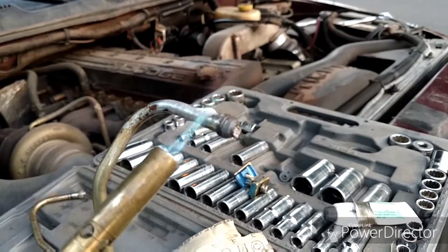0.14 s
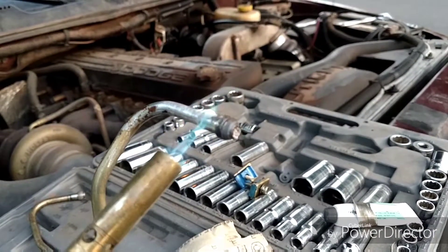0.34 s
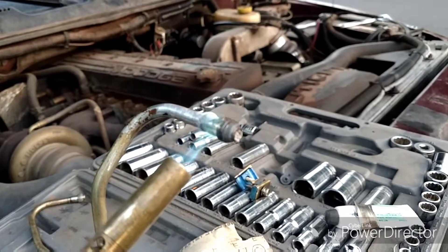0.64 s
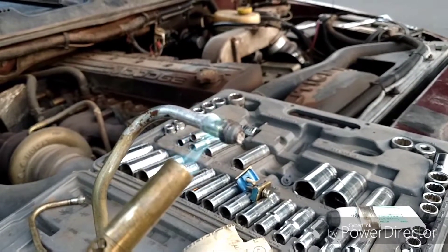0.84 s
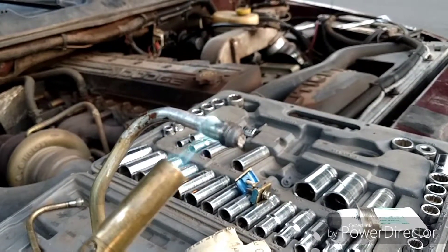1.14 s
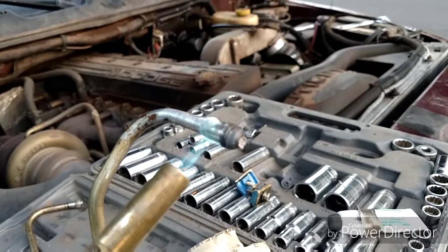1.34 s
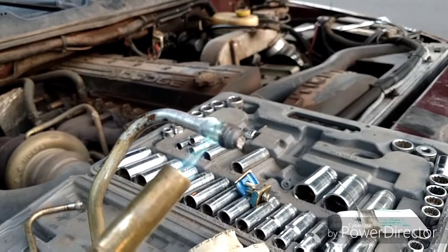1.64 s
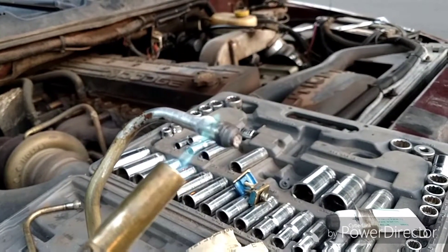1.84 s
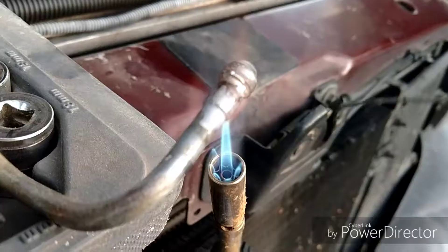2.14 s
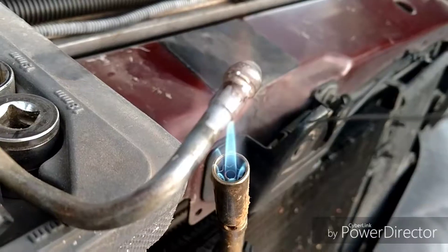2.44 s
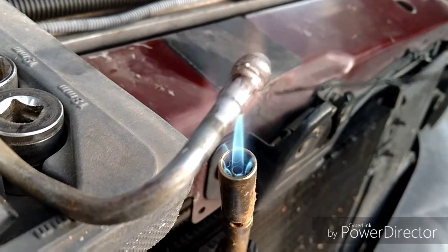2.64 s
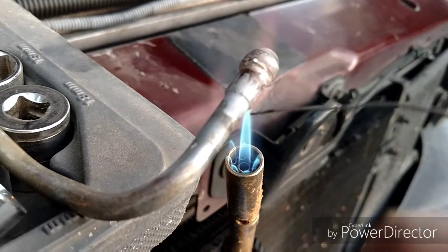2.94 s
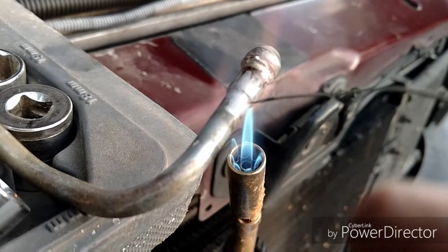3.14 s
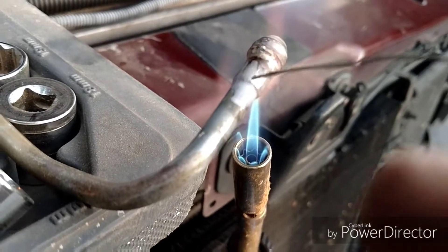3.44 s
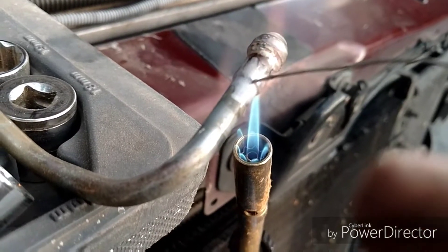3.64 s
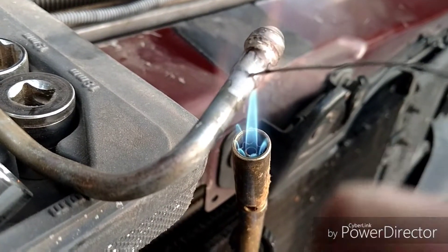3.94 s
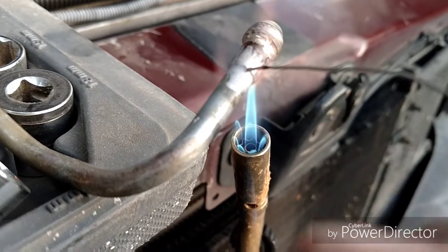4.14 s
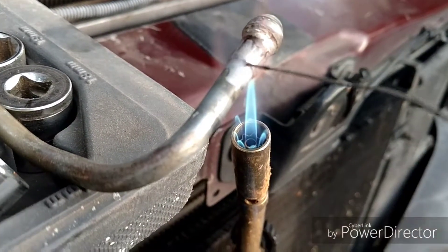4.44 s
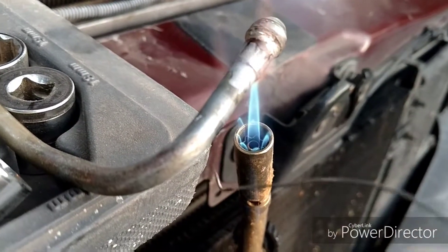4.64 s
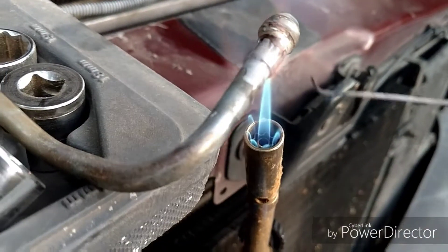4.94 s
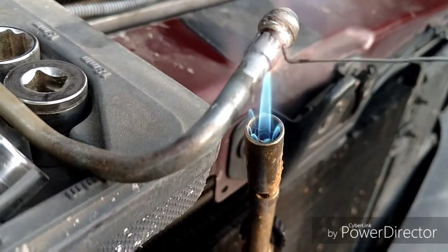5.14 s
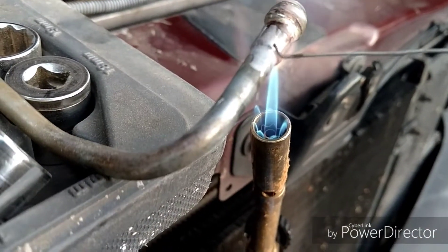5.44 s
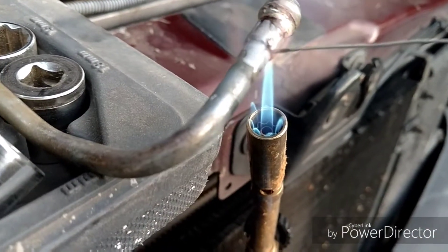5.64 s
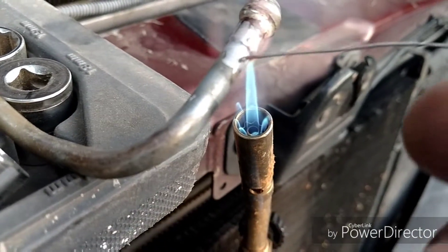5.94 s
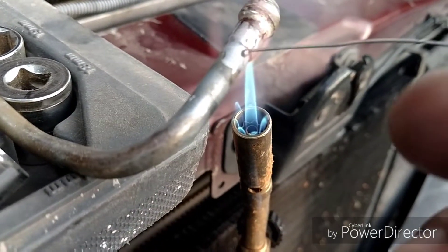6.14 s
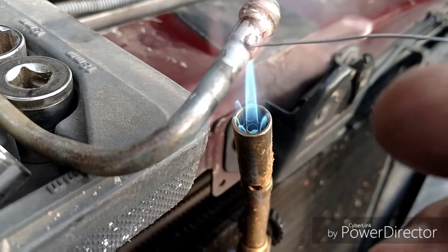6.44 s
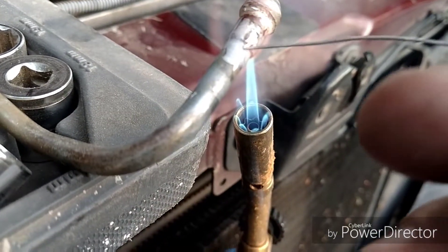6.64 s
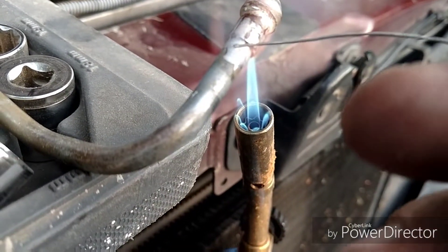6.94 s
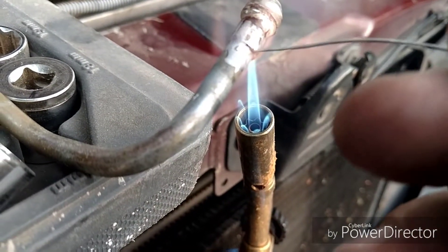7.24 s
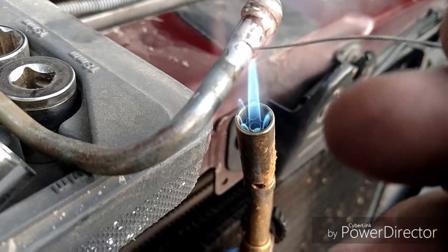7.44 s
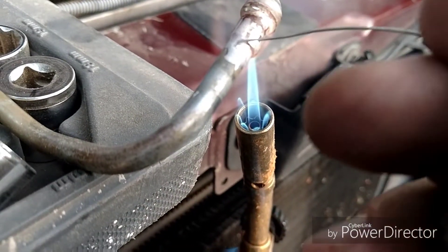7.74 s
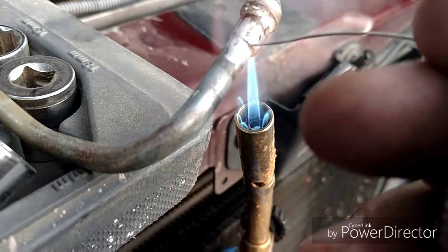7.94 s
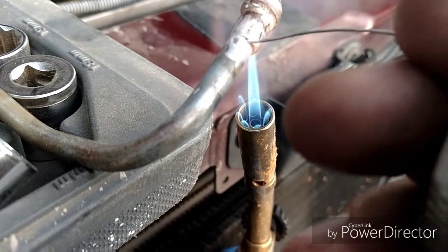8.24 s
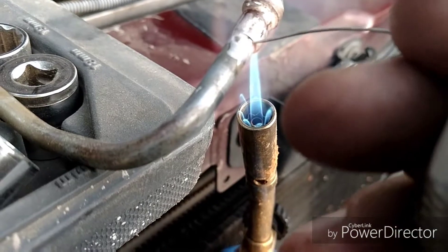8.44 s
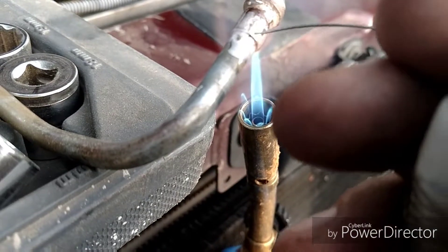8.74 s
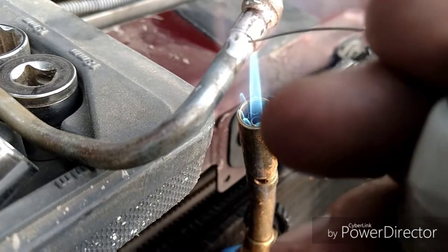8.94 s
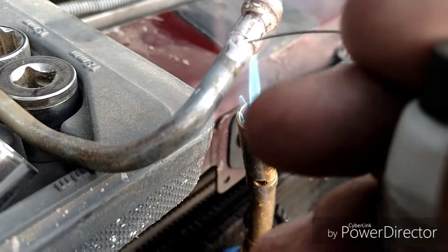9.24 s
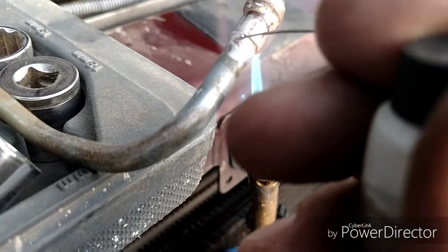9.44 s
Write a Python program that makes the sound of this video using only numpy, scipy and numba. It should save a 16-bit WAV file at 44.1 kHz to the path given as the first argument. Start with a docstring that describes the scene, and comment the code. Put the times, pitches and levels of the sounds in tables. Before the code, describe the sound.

Wavering torch hiss over a distant exhaust drone, a sharp click, then a sudden cut to steady close flame roar and a brief metallic scrape.

```python
"""Gas torch on a steel pipe

A gas torch roars and hisses over an open engine bay, close to a hand-held phone with a port at each end.
At first an engine gathers speed some way off; a sharp click beside the phone makes the limiter duck.
After a quick cross-fade the flame burns closer and steadily, and a solder wire taps and scrapes the pipe.
Gas is shaped noise, exhaust a sum of harmonics, clicks damped sines, and the pipe a set of struck modes."""
import sys
import numpy as np
from scipy import signal
from scipy.fft import rfft, irfft
from scipy.io import wavfile
from scipy.ndimage import uniform_filter1d, minimum_filter1d, map_coordinates
from numba import njit

SR = 44100
rng = np.random.default_rng(int(sys.argv[2]) if len(sys.argv) > 2 else 0)


def put_to_file(sound):
    """Save the sound as 16-bit audio at rate SR, in the file named by the first command-line argument."""
    columns = np.atleast_2d(sound).T  # one column per channel
    safe = np.clip(columns, -1, 1)
    whole_steps = np.round(safe * 32767)
    wavfile.write(sys.argv[1], SR, whole_steps.astype(np.int16))


N = 422478
T = np.arange(N) / SR  # time in s
F = np.maximum(np.fft.rfftfreq(N, 1 / SR), 1)  # frequency in Hz
CUT_S = 2.13  # middle of the cross-fade from the wide to the close position
PORT_NULL_HZ = 2163.5  # sound needs one period of this to travel from port to port
ROAR_TOP_HZ, HISS_TOP_HZ = 2150, 6500  # roar lies below, hiss between, sizzle above


def undb(db):
    """Level law: decibels to amplitude gain."""
    return 10 ** (np.asarray(db) / 20)


def rms(x):
    """Effective value: root mean square."""
    return np.sqrt(np.mean(x ** 2))


def curves(table):
    """Linear interpolation: the columns of a time table at every sample."""
    s, *columns = np.transpose(table)
    return [np.interp(T, s, column) for column in columns]


def colours(table):
    """Interpolation over log frequency: the columns of a frequency table at every bin."""
    hz, *columns = np.transpose(table)
    return [np.interp(np.log(F), np.log(hz), column) for column in columns]


def white():
    """White noise: a fresh spectrum with equal power at every frequency on average."""
    return rfft(rng.standard_normal(N))


def walk(rate_hz):
    """Low-passed noise: a smooth random course with rms 1 that moves about rate_hz times a second."""
    x = irfft(white() / (1 + (F / rate_hz) ** 4), N)
    return x / rms(x)


def resonance(hz, width_hz):
    """Damped resonance: the response of one mode, gain 1 at its centre."""
    return 1 / (1 + 1j * (F / hz - hz / F) * hz / width_hz)


@njit
def band_pass(x, hz, width_hz):
    """State-variable filter: a band-pass whose centre may move, gain 1 there."""
    y, band, low = np.empty(len(x)), 0., 0.
    for i in range(len(x)):
        g = np.tan(np.pi * hz[i] / SR)
        damping = width_hz / hz[i]
        v = (band + g * (x[i] - low)) / (1 + g * (g + damping))
        band = 2 * v - band
        low = low + 2 * g * v
        y[i] = damping * v
    return y


def lift(x, hz, width_hz, db):
    """Peaking equalisation: raises or hollows one band; its centre and depth may move."""
    return x + (undb(db) - 1) * band_pass(x, hz + np.zeros(N), float(width_hz))


def swells(table):
    """Narrow-band noise: resonated noise bands under bell-shaped envelopes."""
    out = np.zeros(N)
    for s, db, half_length, hz, width in table:
        band = irfft(white() * resonance(hz, width) ** 2, N)
        out += undb(db) * band / rms(band) * np.exp(-((T - s) / half_length) ** 2)
    return out


def turbulence(colour, reach_hz, depth, notch_width=0.6):
    """Partial coherence: gas noise at two spaced ports, with alternate mid and side notches up to reach_hz."""
    mid_db, side_db, lean, lead = colours(colour)
    shared = lean + 1j * lead
    shared = shared / np.maximum(abs(shared) / .98, 1)  # coherence stays below 1
    mid = white()
    side = shared * mid + np.sqrt(1 - abs(shared) ** 2) * white()
    angle = np.pi * F / PORT_NULL_HZ
    cut = min(depth, 1) * np.exp(-(F / reach_hz) ** 8)
    mid_notch = 1 - cut * np.exp(-(np.sin(angle) / notch_width) ** 2) * (angle > np.pi / 2)
    side_notch = 1 - cut * np.exp(-(np.cos(angle) / notch_width) ** 2)
    return np.array([mid * mid_notch * undb(mid_db), side * side_notch * undb(side_db)])


def part(gas, lo_hz, hi_hz):
    """Band splitting: left and right of one range of the gas noise, relative to the body of the roar."""
    mid, side = irfft(gas * (F >= lo_hz) * (F < hi_hz), N)
    body = irfft(gas[0] * (F > 350) * (F < ROAR_TOP_HZ), N)
    return np.array([mid + side, mid - side]) / rms(body)


def torch(flame, colour, hollows, reach_hz, notch_depth, flutter_db, sputter_db, grain_db):
    """Turbulent combustion: the roar flutters; hiss and sizzle share half of it, with sputter and fine grain."""
    roar_db, hiss_db, sizzle_db = flame
    gas = turbulence(colour, reach_hz, notch_depth)
    for hz, width, db in hollows:
        gas = gas * (1 + (undb(db) - 1) * resonance(hz, width))
    roar = part(gas, 0, ROAR_TOP_HZ)
    hiss = part(gas, ROAR_TOP_HZ, HISS_TOP_HZ)
    sizzle = part(gas, HISS_TOP_HZ, SR / 2)
    flutter = flutter_db * walk(33.0)
    jet_db = flutter / 2 + sputter_db * walk(24.0) + grain_db * walk(236)
    return roar * undb(roar_db + flutter) + hiss * undb(hiss_db + jet_db) + sizzle * undb(sizzle_db + jet_db)


def thinning(x, hz, width_hz, start_db, fall_db_per_s):
    """Spectral tilt in time: the low body of the roar thins out as the flame settles on the pipe."""
    return np.array([lift(port, hz, width_hz, start_db - fall_db_per_s * T) for port in x])


# How squarely the hand-held flame meets the pipe: time_s, hiss_lift_db
AIM_LIFT = [(0, 2), (.1, 0.5), (.19, 2.5), (.46, 5.5), (.6, 6), (.69, 3.5), (.78, 0), (1.3, 1), (1.51, -2),
            (1.6, 2), (1.74, 3.5)]


def wandering_flame():
    """Impingement: roar, hiss and sizzle levels in dB grow as the flame meets the pipe more squarely."""
    base_db = np.array([[-35], [-34.5], [-34.5]])
    aim_db, = curves(AIM_LIFT)
    shares = [0.6, 1, 0.19]  # of the hiss lift, in roar, hiss and sizzle
    return base_db + np.outer(shares, aim_db) + surges()


def sway(x, lag_s, rate_hz=4.8):
    """Variable delay: the flame shifts before the phone, so the lag between ports and the notches wander."""
    shift = lag_s * SR * walk(rate_hz) / 2
    moved = [map_coordinates(port, [np.arange(N) + sign * shift], order=3, mode="mirror")
             for port, sign in zip(x, (1, -1))]
    return np.array(moved)


# Colour of the wide torch noise, its low and its high range:
# pitch_hz, relative_mid_db, relative_side_db, left_lean (-1..1), left_port_lead (-1..1)
WIDE_LOW_COLOUR = [(40, -24.0, -13.0, 0, 0), (126, -7, -14, 0.3, -0.65), (330, -8, -10.5, 0.35, -0.29),
                   (594, -6.5, -11, 0.18, -0.46), (1010, -0.5, 1, 0.65, -0.13),
                   (1500, -13.5, -10, -1.0, 0.23), (1650, -17.5, -16, 0.069, 0.86),
                   (1900, -7, -6, 0.035, 0.79)]
WIDE_HIGH_COLOUR = [(2180, -13, -18.0, 0.2, 0.06), (2800, -11.5, -11.5, 0.95, 0.14),
                    (3400, -18, -13, -0.34, -0.12), (3900, -18.5, -9.5, 0.21, -0.74),
                    (4300, -8, -16.5, -0.25, 0.38), (5200, -10, -12, -0.013, 0.0095),
                    (6430, -28, -24.5, -0.22, -0.1), (7400, -21.5, -15, 0.22, -0.05),
                    (8440, -31, -32, -0.02, 0.18), (9000, -21.5, -16, 0.42, -0.21),
                    (10500, -23.0, -22, -0.2, -0.06), (12500, -23.5, -25.5, -0.42, 0.08),
                    (15200, -29.5, -27.0, -0.31, -0.04)]
# Hollows of burner tube and engine bay that the gas noise rings: pitch_hz, width_hz, lift_db
WIDE_HOLLOWS = [(268, 9, 10), (1040, 110, 0.5), (1240, 99, 4.5), (1890, 74, 3.5)]


def wide_torch():
    """Cavity-coloured jet noise: the torch from the wide position, its aim wandering."""
    colour = list(WIDE_LOW_COLOUR) + list(WIDE_HIGH_COLOUR)
    gas = torch(wandering_flame(), colour, WIDE_HOLLOWS, reach_hz=11400, notch_depth=1.0,
                flutter_db=1.23, sputter_db=0.8, grain_db=0.6)
    return thinning(sway(gas, lag_s=0.000005), hz=368, width_hz=150, start_db=1.0, fall_db_per_s=2.0)


# Exhaust lines: cycle_rate_multiple, relative_db, left_minus_right_db, left_port_lead_rad
EXHAUST_LINES = [(5, -4, 3, -1.94), (6, -26, -4, -1.5), (7, -12, -5, -1.2), (8, -4, 5.5, -0.81),
                 (9, -17, 3, 0.15), (10, -10, 8, -0.31), (11, -4.5, 3, -1.3), (13, -21, -1, -0.19),
                 (15, -18, 12, -0.88), (16, -22, -3, -0.21)]
# The engine's speed creeps up: time_s, cycle_rate_hz
CYCLE_RATE = [(0, 15.7), (.38, 15.72), (.68, 16.18), (.98, 16.65), (1.28, 16.72), (1.72, 17.23),
              (2.1, 17.23)]
# Swell of the lowest exhaust line: time_s, lift_db
LOWEST_LINE_SWELL = [(0, 4.5), (.45, 0), (.95, -1), (1.1, 2), (1.74, 4.5), (2.1, 2)]


def engine(waver_db, wander):
    """Harmonic series: an uneven exhaust note climbs slowly; only its low lines carry this far."""
    (hz,), (swell_db,) = curves(CYCLE_RATE), curves(LOWEST_LINE_SWELL)
    turn = 2 * np.pi * np.cumsum(hz * (1 + wander * walk(8.3))) / SR
    sides = np.array([[.5], [-.5]])
    out = 0
    for row, (order, db, pan_db, lead) in enumerate(EXHAUST_LINES):
        phase = round(order) * turn + rng.uniform(0, 2 * np.pi)
        line_db = db + swell_db * (row == 0) + waver_db * walk(8.9)
        out = out + undb(line_db + sides * pan_db) * np.sin(phase + sides * lead)
    start_db, db_per_hz = -34.5, 0.3  # louder when faster
    return np.sqrt(2) * out * undb(start_db + db_per_hz * (hz - hz[0]))


# Brief surges and dips of roar and hiss: peak_s, hiss_lift_db, roar_lift_db, half_length_s
BRIEF_SURGES = [(0.298, 6, 1.5, 0.052), (1.116, 7, 1.5, 0.023), (1.2, 3, -1.5, 0.014),
                (1.399, 4, 3.5, 0.015), (1.428, 5, -2, 0.016), (1.6, 0.5, 2, 0.035),
                (1.705, -1, 0.5, 0.025), (2.27, 2.2, -0.1, 0.61), (2.45, 1, 0, 0.012),
                (3.928, 0, 4, 0.0089), (4.5, 1, 0.1, 0.13), (5.381, 1.5, -0.1, 0.25),
                (7.26, 1.5, 1.5, 0.04), (8.977, 1, 2, 0.012)]


def surges():
    """Amplitude modulation: lift of roar, hiss and sizzle in dB, each surge or dip coming and going smoothly."""
    out = np.zeros((3, N))
    for s, hiss_db, roar_db, half_length in BRIEF_SURGES:
        swell = np.exp(-((T - s) / half_length) ** 2)
        out += np.outer([roar_db, hiss_db, 0.82 * hiss_db], swell)
    return out


# Clicks beside the right port, before the limiter: start_s, envelope_peak_db, pitch_hz, t60_s
NEAR_CLICKS = [(1.7616, 16, 6550, 0.0014), (1.766, 11, 5200, 0.00067)]


def clicks(shadow_db=-7):
    """Damped oscillation: hard, dead clicks reach the right port first and the left one shadowed."""
    out = np.zeros((2, N))
    delay_s = np.array([[1 / PORT_NULL_HZ], [0]])
    for s, db, hz, t60 in NEAR_CLICKS:
        age = np.maximum(T - s - delay_s, 0)
        out += undb(db - 60 * np.minimum(age / t60, 10)) * np.sin(2 * np.pi * hz * age)
    return out * undb([[shadow_db], [0]])


def limiter(x, ceiling_db, quick_share=0.38, quick_s=0.057, slow_s=6.7, ahead_s=0.001):
    """Gain reduction: turns down just ahead of a peak; part of the gain returns at once, the rest slowly."""
    ahead = max(int(ahead_s * SR), 1)
    peak = -minimum_filter1d(-abs(x).max(axis=0), 2 * ahead)
    log_excess = np.log(np.maximum(20 * np.log10(peak + 1e-9) - ceiling_db, 1e-9))
    # in the log domain a straight fall is an exponential release of the excess dB
    quick, slow = (np.exp(np.maximum.accumulate(log_excess + T / s) - T / s) for s in (quick_s, slow_s))
    held_db = quick_share * quick + (1 - quick_share) * slow
    return x * undb(-.7 * uniform_filter1d(held_db, ahead))


def held_flame():
    """Steady combustion: roar, hiss and sizzle levels in dB, an even roar under slowly rising treble."""
    age = np.maximum(T - CUT_S, 0)
    settling_db = -4.5 * np.exp(-(age / 0.54) ** 2)  # the sizzle starts weak and settles
    drift_db = np.array([np.zeros(N), 0.43 * age, 0.12 * age + settling_db])  # rises in dB per s
    return -32 + drift_db + surges()


def glance(x, lag_s=0.000864, drift_s=0.00003, echo_db=-13, above_hz=3000, rate_hz=1.8):
    """Comb filtering: hiss glances off nearby metal; drifting hands move the lag, and ripples cross the treble."""
    treble = irfft(rfft(x) / (1 + (above_hz / F) ** 4), N)
    late = T - lag_s - drift_s * walk(rate_hz)
    return x + undb(echo_db) * np.array([np.interp(late, T, port) for port in treble])


# Colour of the close torch noise, low and high range, its middle nearly empty near 2.1 kHz:
# pitch_hz, relative_mid_db, relative_side_db, left_lean (limited with the lead), left_port_lead (-1..1)
CLOSE_LOW_COLOUR = [(40, -31.5, -21, 0.19, -0.65), (99, -12.5, -6, 0.068, -0.79),
                    (236, -9, -12, 0.22, -0.79), (404, -9, -17, 0.43, -0.82), (768, 1.14, -8.5, 0.7, -0.24),
                    (1090, 0, -13, 0.0059, 0.12), (1440, -4.5, -2, -0.91, 0),
                    (1690, -5.5, -7.5, -1.34, 0.23), (1848, -7.5, 5.5, -0.55, -0.068),
                    (2070, -87, -23, 0.3, 0.071)]
CLOSE_HIGH_COLOUR = [(2530, -39.5, -10.5, 0.2, -0.27), (2587, -11.5, -3.5, 0.95, 0.26),
                     (3180, -15, -11, -0.42, -0.25), (3720, -14.5, -10, 0.67, -0.56),
                     (4430, -4.5, -4, -0.58, 0.2), (5145, -9.5, -19.5, 0, 0.49),
                     (6090, -22.5, -16, -0.6, -0.37), (6550, -32.5, -21.5, 0.46, 0.18),
                     (6960, -21, -21, 0.37, 0.29), (7600, -22.5, -20, -0.37, 0.1),
                     (8200, -27.5, -18.5, -0.5, -0.34), (8800, -23, -28, -0.18, 0.097),
                     (9670, -20, -24, 0.16, -0.18), (10500, -24.5, -28, -0.069, 0.1),
                     (11900, -25.5, -25, 0.15, -0.1), (12650, -19, -22.5, -0.51, -0.44),
                     (13250, -26, -27, -0.74, 0.11), (13900, -26.5, -26, -0.55, 0.23),
                     (14550, -34.5, -33.5, -0.54, -0.05), (15300, -28, -27, -0.65, -0.07)]
# Hollows of burner tube and engine bay that colour the gas noise: pitch_hz, width_hz, lift_db
CLOSE_HOLLOWS = [(115.2, 22, 0), (241.5, 29, 4), (404, 46, 6), (464, 66, -3), (570, 120, 2),
                 (657, 37, -2.5), (778, 51, 2.3), (856, 43, -3), (1010, 130, 1.5), (1170, 21, 4)]


def close_torch():
    """Jet noise with a reflection: the torch held still in the close position."""
    colour = list(CLOSE_LOW_COLOUR) + list(CLOSE_HIGH_COLOUR)
    gas = torch(held_flame(), colour, CLOSE_HOLLOWS, reach_hz=5900, notch_depth=0.88,
                flutter_db=0.92, sputter_db=0.59, grain_db=-0.05)
    return thinning(glance(gas), hz=190, width_hz=240, start_db=2.5, fall_db_per_s=0.32)


# Drifting hollow in the middle of the stereo image: time_s, pitch_hz, lift_db
DRIFTING_HOLLOW = [(2.15, 3900, -18), (2.25, 3500, -16), (2.42, 3540, -16), (2.85, 3400, -1.5),
                   (4.8, 3360, -4), (5.1, 3350, -10), (5.86, 3240, -13), (5.92, 3780, -4),
                   (6.05, 3830, -24), (6.2, 3900, 4), (6.7, 3900, -31), (7.35, 3900, -6), (7.8, 4010, -22),
                   (8.35, 3960, -13), (8.8, 4030, -4)]


def drifting_hollow(mid, width_hz=560):
    """Moving equalisation: a hollow of changing depth drifts through the hiss in the middle of the image."""
    hz, db = curves(DRIFTING_HOLLOW)
    for _ in range(2):  # two half-depth passes add up to the full depth
        mid = lift(mid, hz, width_hz, db / 2)
    return mid


# How far the hand that feeds the wire is drawn back from the phone: time_s, distance (0-1)
HAND_DISTANCE = [(4.05, 0), (4.3, 0.3), (4.65, 0.7), (4.95, 0.2), (5.2, 0.5), (5.5, 0.8), (5.8, 0.6),
                 (6.05, 0.75), (6.25, 0.54), (7.25, 0.5), (8, 0)]
# Colour at the right port: pitch_hz, width_hz, hand_near_db, hand_away_db
RIGHT_PORT_COLOUR = [(3170, 200, 2, -2), (8700, 2800, -0.9, 5)]


def past_hand(x):
    """Acoustic shadowing: the hand, drawn back, uncovers the right port; a hollow drifts in the middle."""
    away, = curves(HAND_DISTANCE)
    mid, side = drifting_hollow(x.mean(axis=0)), (x[0] - x[1]) / 2
    left, right = mid + side, mid - side
    for centre_hz, width_hz, near_db, away_db in RIGHT_PORT_COLOUR:
        right = lift(right, centre_hz, width_hz, near_db + away * (away_db - near_db))
    return np.array([left, right])


# A faint low drone in the distance: peak_s, level_db, half_length_s, pitch_hz, width_hz
DISTANT_DRONES = [(2.42, -52, 0.11, 101, 26), (4.15, -51, 0.2, 104.6, 16)]


def drones():
    """Narrow-band noise: a low drone swells faintly, alike at both ports."""
    return swells(DISTANT_DRONES)


# The wire taps the pipe: start_s, peak_db
WIRE_TAPS = [(5.6784, -5.5), (5.6795, -9.5), (5.6822, -18), (5.6852, -18), (5.6878, -13), (5.7099, -8.3),
             (5.7115, -15), (5.7146, -14), (5.723, -18)]
# What pipe and wire ring with: pitch_hz, width_hz, relative_db
RINGING_MODES = [(300, 80, 9), (566, 85, 16), (1040, 320, 12.5), (1390, 530, 4), (1770, 220, 3),
                 (2600, 290, -10), (3700, 360, -16)]
# Short spits of solder in the flame: peak_s, level_db, half_length_s, pitch_hz, width_hz
SOLDER_SPITS = [(5.722, -34.5, 0.035, 2660, 350), (6.208, -39, 0.022, 3500, 300)]


def wire(lag_s=0.000243, contact_hz=3900, slip_db=-27, slips_per_s=420, scatter_db=2.0):
    """Modal excitation and stick-slip: taps and fine ticks ring the pipe, solder spits; the left port lags."""
    ring = sum(undb(db) * resonance(hz, width) for hz, width, db in RINGING_MODES)
    ring = ring / (1 + (F / contact_hz) ** 8)  # soft solder cannot strike sharply
    ring = ring / abs(irfft(ring, N)).max()
    blows = sum(undb(db) * np.exp(-2j * np.pi * F * s) for s, db in WIRE_TAPS)
    touching = (T > 5.67) & (T < 5.732)  # the wire slides on the pipe
    struck = rng.random(N) < slips_per_s / SR
    slips = touching * struck * undb(slip_db + scatter_db * rng.standard_normal(N))
    right = irfft(ring * (blows + rfft(slips)), N) + swells(SOLDER_SPITS)
    return np.array([np.interp(T - lag_s, T, right), right])


def scene():
    """Superposition: the sources of the wide position, cross-faded quickly to those of the close one."""
    wide = wide_torch() + engine(waver_db=1.6, wander=0.0004) + clicks()
    before = limiter(wide, ceiling_db=-8.5)
    after = past_hand(close_torch()) + wire() + drones()
    fade = np.clip((T - CUT_S) / 0.014 + .5, 0, 1)
    return before * (1 - fade) + after * fade


def record(dry):
    """Band limiting: the phone cuts the top above 15.5 kHz with a steep elliptic low-pass."""
    low_pass = signal.ellip(10, .2, 70, 15500, fs=SR, output="sos")
    return signal.sosfilt(low_pass, dry)


dry = scene()
out = record(dry)
put_to_file(out)
```